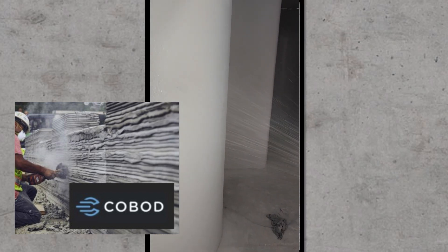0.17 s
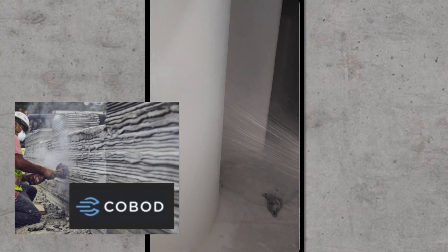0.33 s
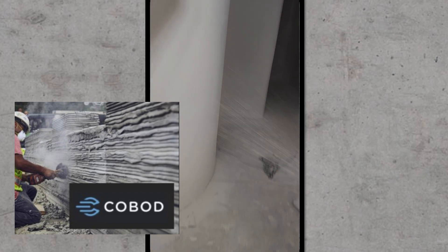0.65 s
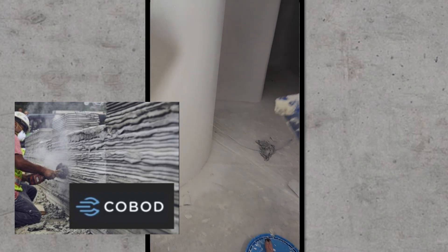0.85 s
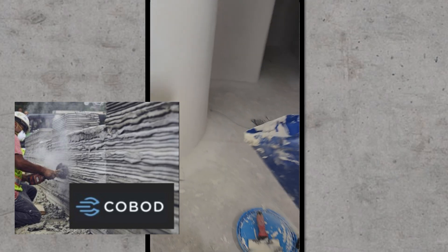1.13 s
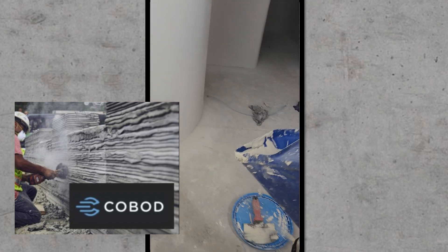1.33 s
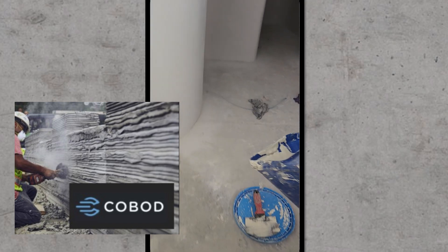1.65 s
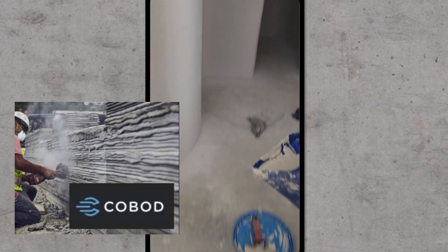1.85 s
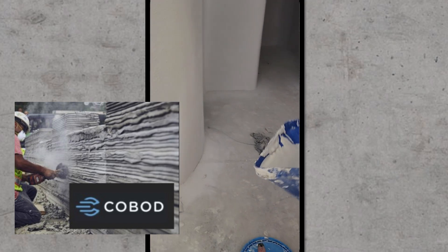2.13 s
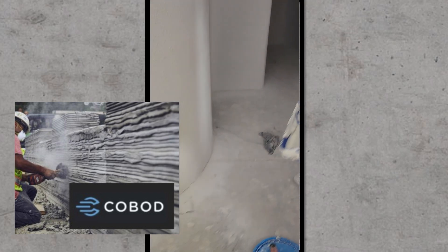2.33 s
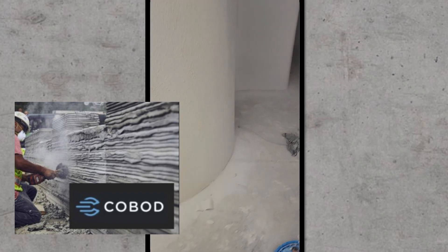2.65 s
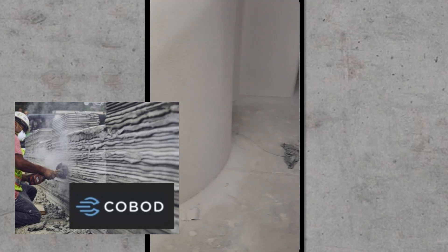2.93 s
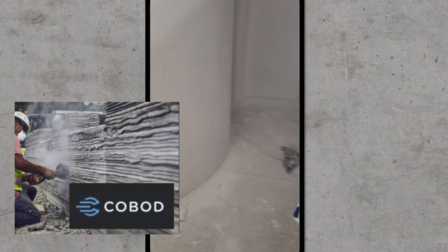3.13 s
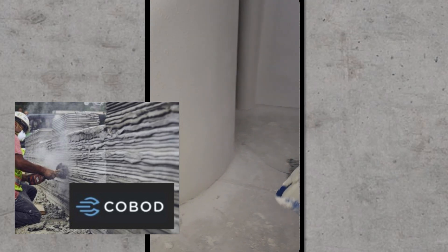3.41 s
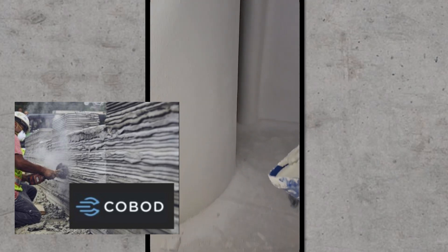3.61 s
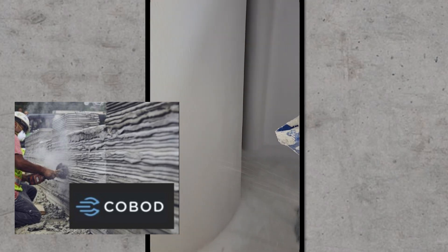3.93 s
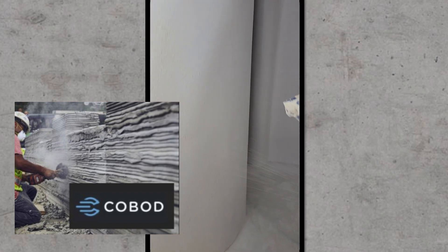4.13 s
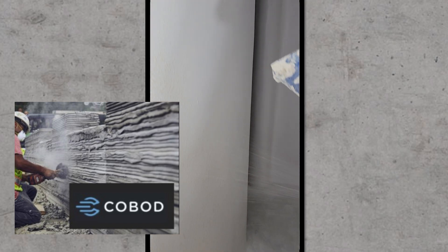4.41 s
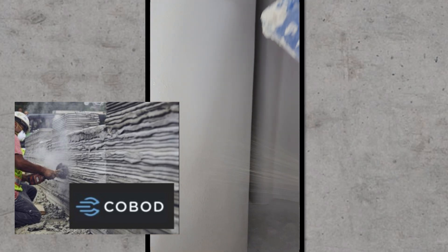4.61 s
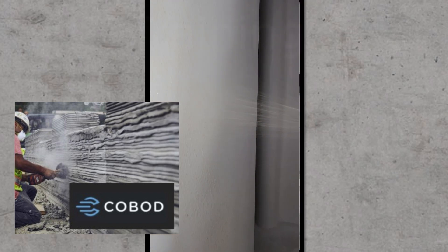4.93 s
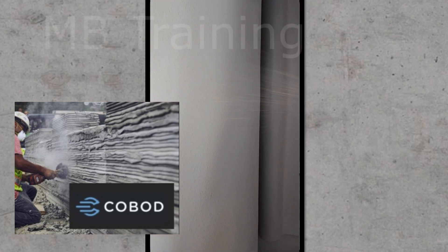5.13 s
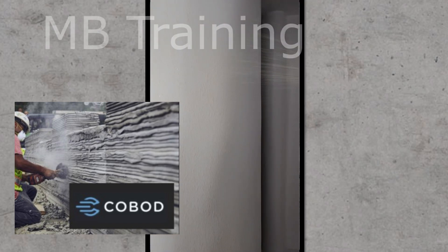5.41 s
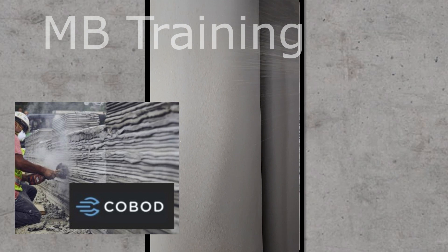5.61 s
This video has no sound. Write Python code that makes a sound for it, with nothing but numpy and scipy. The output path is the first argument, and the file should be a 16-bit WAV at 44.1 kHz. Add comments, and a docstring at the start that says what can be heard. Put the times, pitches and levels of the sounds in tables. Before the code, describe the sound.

Close stereo pickup of a handheld texture gun spraying a concrete column in a bare room. Quiet leaking air comes first, then a quick puff and a long, loud, rough spray with ringing nozzle, fine mist and wet spatter, its tone swirling as the gun moves. It cuts to a brief dribble and leak hiss, then bursts out again to the end. A low motor hums faintly behind.

```python
"""A nozzle's steady air leak hisses over a far-off compressor hum; then a hopper gun's bare jet opens and
wet texture is sprayed onto a concrete column. It stops for about a second and starts again.
Air is filtered noise and gliding humps; shredded mud adds hiss, ring, mist, spatter and hopper roar.
The moving gun shifts the layers between two microphones, over echoes from a hard floor and walls.
"""
import sys
import numpy as np
from scipy import signal
from scipy.fft import rfft, irfft, next_fast_len
from scipy.io import wavfile

SR = 44100
rng = np.random.default_rng(int(sys.argv[2]) if len(sys.argv) > 2 else 0)


def wav_record(signal):
    """Record a signal, one row per channel, as 16-bit PCM in the file named by sys.argv[1]."""
    frames = np.transpose(np.atleast_2d(signal))
    bounded = np.clip(frames, -1, 1)
    # unit amplitude maps onto the largest positive 16-bit level
    quanta = np.round(bounded * 32767).astype(np.int16)
    wavfile.write(sys.argv[1], SR, quanta)


N = 253971
TIME = np.arange(N) / SR

# Colours of the air and mud, as relative spectra: pitch_hz, left_db, right_db
LEAK_COLOUR = [(715, -17, -20.5), (1400, -20, -21.5), (2380, -17, -19), (3560, -11, -14.5), (5370, -9, -17),
               (6720, -1.5, -11), (7800, -15, -12.5), (9000, -9, -10), (10700, -5.5, -7.5),
               (13600, -4.5, -4.5), (14500, -2.5, 1)]
HISS_COLOUR = [(1270, -10, -13), (2300, -7.5, -11), (3140, -1, -3.5), (4460, 1, -4), (5440, 0, -6.5),
               (6900, -14.5, -18), (8340, -14, -5), (9700, -13, -11.5), (12100, -34, -11)]
NOZZLE_COLOUR = [(4740, -17, -29), (5800, -5, -6), (6550, 2, -9), (6780, 2.5, -11), (7560, -16.5, -4),
                 (7800, -22, -12)]
MIST_COLOUR = [(7000, -20, -34), (8940, -4, -33), (10240, -4, -3), (11300, -7.5, -0.5), (12500, 0, -0.5),
               (13500, -2, -7.5), (15100, -8, 4.5), (15900, -12, 3)]
SPATTER_COLOUR = [(432, -4, -2.5), (730, -4.5, -6.5), (840, 2, -3.5), (1220, -8, -12.5), (1400, 1.5, 2),
                  (1570, -0.5, -7), (1780, 1.5, -1.5), (2530, 0, -9.5), (4000, -15, -6.5), (9000, -38, -10)]
# Cavity modes with a steep lower edge and a long upper skirt: pitch_hz, relative_db
HOPPER_COLOUR = [(280, -28), (315, -19), (345, 1.5), (385, -3), (430, -8.5), (480, -16.5), (600, -26)]
HOPPER_UPPER_COLOUR = [(470, -15), (495, -12.5), (518, 5.5), (550, -3.5), (595, 1), (690, -15), (900, -31)]
GAP_COLOUR = [(950, -20), (1020, -1), (1062, 3.5), (1130, -2.5), (1300, -2), (1600, -13)]
# Low turbulence of the blast, and rumble of the building: pitch_hz, relative_db
BLAST_COLOUR = [(15, -5), (40, -7), (100, -2), (200, -3), (300, -4), (400, -2.5)]
RUMBLE_COLOUR = [(15, -12), (30, -6), (60, 0), (130, -1.5), (190, -3.5), (260, -2.5), (350, -10), (480, -7),
                 (640, -11), (1000, -39), (2000, -33)]
# Compressor lines, before wavering and load: pitch_hz, rms_db
HUM_LINES = [(145.8, -46.5), (241.5, -50.5), (296, -53.5), (441.4, -58), (586.8, -57), (608.3, -71)]
# Load on the compressor, added to its lowest line: time_s, offset_db
LOAD_CURVE = [(0, 0.5), (3, -6), (4.4, 3.5), (5.55, 0), (5.76, 13.5)]
# Level of the leak as the gun turns, before swell and flicker: time_s, level_db
LEAK_CURVE = [(0, -18), (4.5, -19), (4.8, -18.5), (5.15, -21), (5.76, -17)]
# Pulls of the trigger: air valve opens valve_s, mud arrives mud_s, let go stop_s,
# flow that spits ahead of the mud spit_share (0-1), flow that comes at once as a first gob gob_share (0-1)
TRIGGER_PULLS = [(0.327, 0.479, 4.445, 0.22, 0.58), (5.272, 5.455, 6.0, 0.046, 0.4)]
# Swing of the gun across the column: time_s, bearing (0 at the start to 1 at the far end)
BEARING_CURVE = [(.7, 0), (1.5, .25), (2.4, .8), (3, .8), (3.6, 1), (4.4, 1), (4.9, .6), (5.3, .65),
                 (5.6, .95)]
# Levels at full feed of the hopper's roar, its upper mode and the nozzle's ring: time_s, level_db
ROAR_CURVE = [(.7, -24.5), (1.65, -28), (2.05, -21.5), (2.55, -28.5), (3.08, -33), (3.25, -30),
              (3.8, -27.5), (4.4, -26), (5.76, -27.5)]
UPPER_CURVE = [(.6, -31.5), (1.5, -30.5), (2.15, -28.5), (3.2, -31.5), (4.2, -37.5), (5.6, -34.5)]
RING_CURVE = [(.5, -17.5), (1.85, -14.5), (2.1, -17), (2.6, -13.5), (3.05, -13), (3.8, -16), (5.76, -14)]
# Reflection off the floor: time_s, delay_ms
FLOOR_ECHO = [(.7, 3.05), (4.3, 1.47), (5, 1.4), (5.76, 1.9)]

# Time constants (s): valve opening, mud building up, first gob bursting out, valve shutting
VALVE_S, MUD_ATTACK_S, GOB_S, SHUT_S = .016, .055, .008, .007
# On release the coarse mud gives out ahead of the air, and more gently
WET_EARLY_S, WET_SHUT_S = .031, .016
MIST_BUILD_S = .075
# After the valve shuts, a share of the flow dribbles on and dies away
DRIBBLE_SHARE, DRIBBLE_S = .21, .11

# The bare jet's hump with the valve shut and open; mud in the nozzle chokes it
JET_SHUT_HZ, JET_OPEN_HZ = 11300, 6920
JET_SHUT_DB, JET_OPEN_DB, CHOKE_DB, CHOKE_S = -32.5, -23.5, -18, .2
# The hump already falls while the trigger is squeezed
SQUEEZE_S = .13
# The open valve makes the leak swell until the mud fills the nozzle
SWELL_DB, SWELL_S, SWELL_FADE_S = 6, .25, .63

# Pairs at bearing 0 and 1: layer levels at full feed, and how far the jet leans left over right
HISS_DB, MIST_DB = (-14, -15.5), (-15, -12)
SPATTER_DB, GAP_DB = (-22.5, -21), (-33.5, -24)
JET_LEFT_DB = (1.4, -.1)
# Pairs at bearing 0 and 1: how much later the left microphone hears each sound
JET_LAG_MS, SPATTER_LAG_MS, ROAR_LAG_MS = (-.1, .18), (-.27, .14), (-.34, -.19)
# Likeness of each noise at the two microphones (0-1)
JET_LIKENESS, SPATTER_LIKENESS = .62, .62
# Share of the upper mode's swing in dB that the spatter and its gap resonance follow
SPATTER_FOLLOWS = .29

# The nozzle swings past once: when it faces the microphones, and its turns in and out
FACING_S, TURN_IN_S, TURN_OUT_S = 2.8, .75, .9
# Pitch and level of its beam at that moment; the beam fades as the gun moves on
FACING_HZ, BEAM_DB, BEAM_FADE_DB_PER_S = 6660, -26.5, 13

# Strength of the floor's reflection (gain, left and right), and the upper edge of the spectrum
FLOOR_SHARES = (.3, .16)
CUTOFF_HZ = 15800


def from_db(db):
    """Decibels to gain."""
    return 10 ** (np.asarray(db) / 20)


def rms_one(x):
    """Scale to unit rms."""
    return x / np.sqrt(np.mean(x ** 2) + 1e-20)


def curve(rows):
    """A two-column table of times and values, drawn out to every sample."""
    times, values = np.transpose(rows)
    return np.interp(TIME, times, values)


def by_bearing(ends):
    """A quantity that moves between two values as the gun swings."""
    return ends[0] + (ends[1] - ends[0]) * curve(BEARING_CURVE)


def rise(start_s, time_s):
    """Settle exponentially from 0 towards 1 after a start."""
    return 1 - np.exp(-np.maximum(TIME - start_s, 0) / time_s)


def drift(rate):
    """Slow random wander of rms 1, changing about rate times a second."""
    # made at a tenth of the sample rate; the filter's warm-up is dropped
    pole = np.exp(-2 * np.pi * rate * 10 / SR)
    noise = rng.standard_normal(N // 10 + 8002)
    slow = signal.lfilter([1], [1, -2 * pole, pole * pole], noise)[8000:]
    return np.interp(np.arange(N) / 10, np.arange(len(slow)), rms_one(slow))


def pair(likeness):
    """White noise at the two microphones, partly shared."""
    mid, side = rng.standard_normal((2, N))
    return np.sqrt((1 + likeness) / 2) * mid + np.sqrt((1 - likeness) / 2) * side * [[1], [-1]]


def colour(x, points):
    """Give a stereo sound a spectrum (one column, or one a side) and scale it to rms 1."""
    size = next_fast_len(N)
    log_hz = np.log(np.maximum(np.arange(size // 2 + 1) * SR / size, 1))
    hz, *sides = np.transpose(points)
    # beyond the ends the spectrum falls away steeply
    outside = np.abs(log_hz - np.clip(log_hz, np.log(hz[0]), np.log(hz[-1])))
    gains = from_db([np.interp(log_hz, np.log(hz), side) - 40 * outside for side in sides])
    return rms_one(irfft(rfft(x, size) * gains, size)[:, :N])


def panned(x, left_db):
    """Lean a sound to the left, by a steady or a moving amount."""
    return np.array([x[0] * from_db(left_db / 2), x[1] * from_db(-left_db / 2)])


def hump(hz, level_db, width_hz, left_db):
    """Turbulence in a broad resonance whose centre glides: slow noise on a moving carrier."""
    lowpass = signal.butter(2, width_hz / 2, fs=SR, output="sos")
    in_phase, quadrature = signal.sosfilt(lowpass, [pair(.18), pair(.2)])
    phase = 2 * np.pi * np.cumsum(hz) / SR
    turbulence = in_phase * np.cos(phase) + quadrature * np.sin(phase)
    return panned(from_db(level_db) * rms_one(turbulence), left_db)


def jet_hump():
    """Bare jet's centre and level, and the leak's swell: squeeze lowers it, valve lifts it, mud chokes it."""
    hz, level_db, swell_db = JET_SHUT_HZ, JET_SHUT_DB, 0
    for valve_s, mud_s, stop_s, *_ in TRIGGER_PULLS:
        held = 1 - rise(stop_s, SHUT_S)
        squeeze = np.clip(1 + (TIME - valve_s - VALVE_S) / SQUEEZE_S, 0, 1)
        opening_db = (JET_OPEN_DB - JET_SHUT_DB) * rise(valve_s, VALVE_S)
        choking_db = CHOKE_DB * rise(mud_s, CHOKE_S)
        hz = hz + held * squeeze * (JET_OPEN_HZ - JET_SHUT_HZ)
        level_db = level_db + held * (opening_db + choking_db)
        swell_db = swell_db + held * SWELL_DB * rise(valve_s, SWELL_S) * (1 - rise(mud_s, SWELL_FADE_S))
    return hz, level_db, swell_db


def air():
    """The nozzle's steady leak and the jet that opens ahead of the mud: a narrow hump on a broad one."""
    hz, level_db, swell_db = jet_hump()
    leak_db = curve(LEAK_CURVE) + swell_db + .5 * drift(18)
    leak = from_db(leak_db) * colour(pair(.056), LEAK_COLOUR)
    narrow = hump(hz, level_db + 4, width_hz=1600, left_db=3.5)
    broad = hump(hz, level_db - 4, width_hz=3100, left_db=2.5)
    return leak + (narrow + broad) * from_db(drift(25))


def compressor():
    """Wavering motor lines over the building's dull rumble; the lowest line swells with the load."""
    lines = 0
    for k, (hz, level_db) in enumerate(HUM_LINES):
        phase = 2 * np.pi * np.cumsum(hz * (1 + .00445 * drift(3))) / SR
        line_db = level_db + 2 * drift(1.3)
        if k == 0:
            line_db = line_db + curve(LOAD_CURVE)
        lines = lines + from_db(line_db) * np.sqrt(2) * np.sin(phase)
    return lines + from_db(-41.5) * colour(pair(.74), RUMBLE_COLOUR)


def mud_feed(early_s, shut_s):
    """Flow through the nozzle, 0-1: each pull spits a little, builds up, is shut off and dribbles."""
    feed = 0
    for valve_s, mud_s, stop_s, spit, gob in TRIGGER_PULLS:
        first = spit * rise(valve_s, VALVE_S) + gob * rise(mud_s, GOB_S)
        opened = first + (1 - spit - gob) * rise(mud_s, MUD_ATTACK_S)
        end_s = stop_s - early_s
        shut = (1 - DRIBBLE_SHARE) * rise(end_s, shut_s) + DRIBBLE_SHARE * rise(end_s, DRIBBLE_S)
        feed = feed + opened * (1 - shut)
    return feed


def blobs(per_s, spread_db, burst_s):
    """Blobs of mud tear off at random, each a brief burst of its own size: an envelope of rms 1."""
    sizes = from_db(spread_db * np.minimum(rng.exponential(1, N), 3))
    born = rng.random(N) < per_s / SR
    power = signal.lfilter([1], [1, -np.exp(-1 / (burst_s * SR))], born * sizes ** 2 + 1e-12)
    return np.sqrt(power / power.mean())


def grainy(bursts, share):
    """Envelope of a flow of which a share of the power comes in bursts."""
    return np.sqrt(1 - share + share * bursts ** 2)


def jet_hiss(surge, bursts):
    """Air shredding the mud: broadband noise that surges and sputters with the flow."""
    level_db = by_bearing(HISS_DB) + surge + .52 * drift(13)
    return from_db(level_db) * colour(pair(JET_LIKENESS) * grainy(bursts, share=.22), HISS_COLOUR)


def nozzle_ring():
    """The nozzle's resonances ring in the flow and flutter in level."""
    level_db = curve(RING_CURVE) + 1.44 * drift(60)
    return from_db(level_db) * colour(pair(JET_LIKENESS), NOZZLE_COLOUR)


def shimmer(x, split_hz, depth_db, rate):
    """The jet beams its treble unevenly: the parts below and above a split waver on their own."""
    lower = signal.sosfiltfilt(signal.butter(2, split_hz, fs=SR, output="sos"), x)
    return lower * from_db(depth_db * drift(rate)) + (x - lower) * from_db(depth_db * drift(rate))


def fine_mist():
    """Fine droplets in the jet: a high, shimmering noise."""
    mist = colour(pair(JET_LIKENESS), MIST_COLOUR)
    return from_db(by_bearing(MIST_DB)) * shimmer(mist, split_hz=12600, depth_db=1.58, rate=32)


def misting(feed):
    """The fine mist takes a moment to build up but stops with the flow."""
    keep = np.exp(-1 / (MIST_BUILD_S * SR))
    return np.minimum(feed, signal.lfilter([1 - keep], [1, -keep], feed))


def spatter_on_column(splashes, upper_db):
    """Mud bursts on the column, with a gap resonance; both partly follow the hopper's upper mode."""
    swing_db = SPATTER_FOLLOWS * (upper_db - upper_db.mean())
    spatter = colour(pair(SPATTER_LIKENESS) * splashes, SPATTER_COLOUR)
    gap = panned(colour(pair(SPATTER_LIKENESS) * splashes, GAP_COLOUR), left_db=2)
    return from_db(by_bearing(SPATTER_DB) + swing_db) * spatter + from_db(by_bearing(GAP_DB) + swing_db) * gap


def hopper_roar(bursts, splashes, upper_db):
    """The sputtering flow drives the hopper's cavity modes."""
    # the lowest mode rings longest and evens out the bursts
    lowest = colour(pair(.88) * grainy(bursts, share=.066), HOPPER_COLOUR)
    upper = colour(pair(.76) * splashes, HOPPER_UPPER_COLOUR)
    return from_db(curve(ROAR_CURVE)) * panned(lowest, left_db=2) + from_db(upper_db) * panned(upper, left_db=2.5)


def low_blast():
    """Low turbulence of the blast: steady dark noise."""
    return from_db(-36.5) * panned(colour(pair(.32), BLAST_COLOUR), left_db=1.7)


def nozzle_pass():
    """The nozzle swings past: its beam's hump sinks to its lowest pitch when facing us, then climbs."""
    angle = (TIME - FACING_S) / np.where(TIME < FACING_S, TURN_IN_S, TURN_OUT_S)
    hz = FACING_HZ * (1 + np.minimum(angle ** 2, 2))
    level_db = BEAM_DB - BEAM_FADE_DB_PER_S * (TIME - FACING_S)
    in_beam = 1 / (1 + angle ** 16)
    return in_beam * hump(hz, level_db, width_hz=3100, left_db=8.5)


def spray(feed, wet):
    """One uneven flow of air and mud drives the jet, the spatter and the roar."""
    upper_db = curve(UPPER_CURVE)
    surge = drift(37)
    bursts = blobs(per_s=420, spread_db=3, burst_s=.00097)
    splashes = grainy(bursts, share=.59) * from_db(.12 * surge)
    jet = feed * (jet_hiss(surge, bursts) + nozzle_ring() + nozzle_pass()) + misting(feed) * fine_mist()
    spatter = wet * spatter_on_column(splashes, upper_db)
    # the hopper only speaks at full feed: it starts last and stops first
    roar = wet ** 2 * hopper_roar(bursts, splashes, upper_db) + feed * low_blast()
    return jet, spatter, roar


def finer(x):
    """Four times the samples, so that delays keep the treble intact."""
    return signal.resample_poly(x, 4, 1, axis=1)


def delayed(fine, delay_ms):
    """Each side of a finely sampled sound, read a moving time earlier."""
    earlier = 4 * (np.arange(N) - np.broadcast_to(delay_ms, (2, N)) * SR / 1000)
    return np.array([np.interp(at, np.arange(len(side)), side) for side, at in zip(fine, earlier)])


def off_axis(x, lags_ms):
    """A source to one side reaches one microphone first."""
    return delayed(finer(x), by_bearing(lags_ms) * np.array([[.5], [-.5]]))


def among_walls(x, wall_share, swing_ms, count=3):
    """Floor, column and walls reflect the jet; their combs swirl as the gun moves."""
    floor, fine = np.array(FLOOR_SHARES)[:, None], finer(x)
    out = x + floor * delayed(fine, curve(FLOOR_ECHO))
    for path_ms in np.geomspace(2.1, 7, count):
        wander_ms = swing_ms * np.array([drift(.2587), drift(.2414)])
        side_paths_ms = path_ms * rng.uniform(.85, 1.15, (2, 1))
        out = out + wall_share * delayed(fine, side_paths_ms + wander_ms)
    return out / np.sqrt(1 + floor ** 2 + count * wall_share ** 2)


def scene():
    """The jet between floor and column, spatter on the column, the hopper's roar, the compressor behind."""
    jet, spatter, roar = spray(feed=mud_feed(0, SHUT_S), wet=mud_feed(WET_EARLY_S, WET_SHUT_S))
    direct = panned(off_axis(jet + air(), JET_LAG_MS), by_bearing(JET_LEFT_DB))
    gun = among_walls(direct, wall_share=.49, swing_ms=.5985)
    return gun + off_axis(spatter, SPATTER_LAG_MS) + off_axis(roar, ROAR_LAG_MS) + compressor()


def record(dry):
    """The top of the spectrum is cut off steeply."""
    size = next_fast_len(N)
    passed = np.arange(size // 2 + 1) * SR / size < CUTOFF_HZ
    return irfft(rfft(dry, size) * passed, size)[:, :N]


dry = scene()
out = record(dry)
wav_record(out)
```